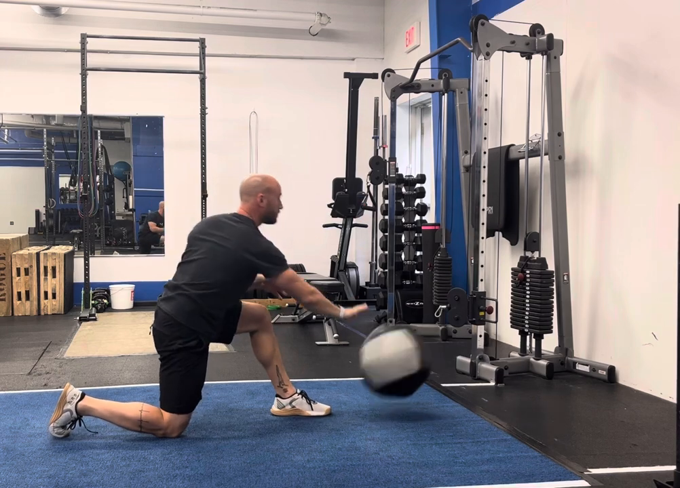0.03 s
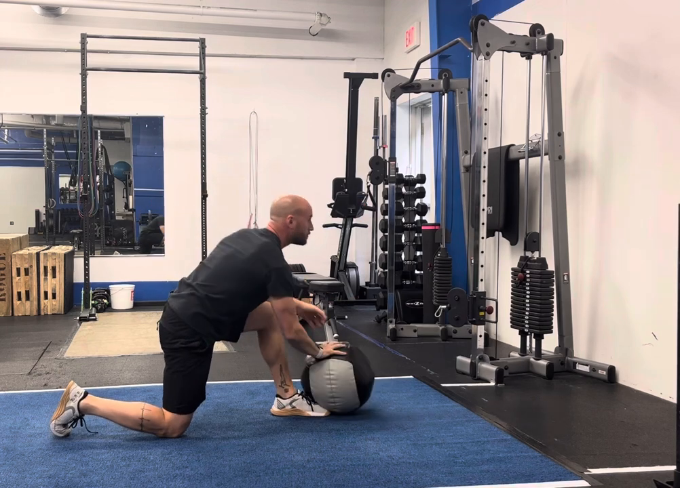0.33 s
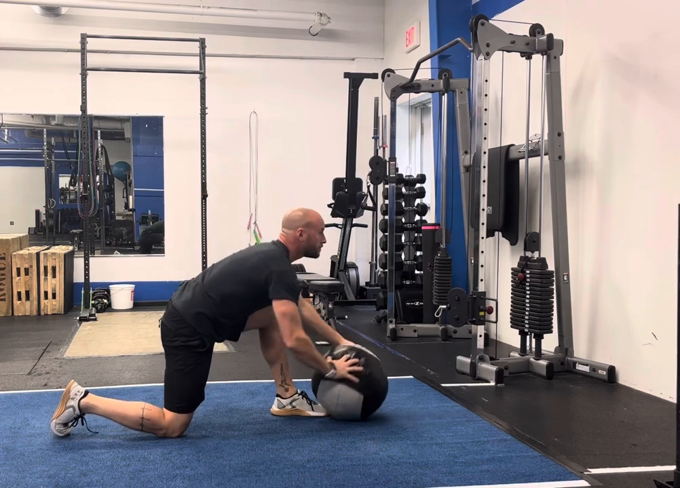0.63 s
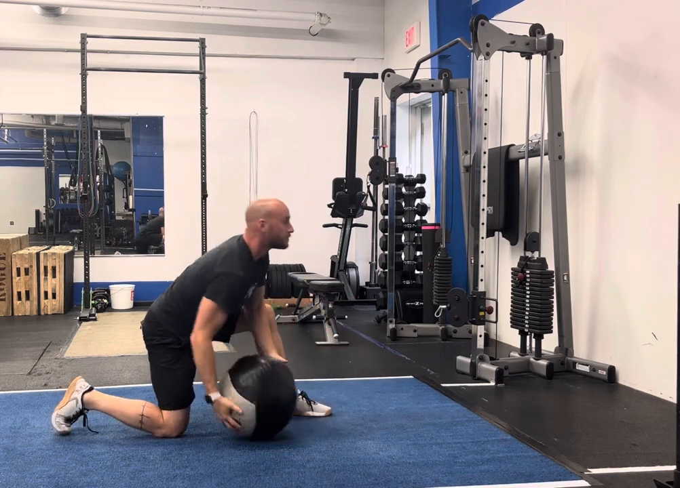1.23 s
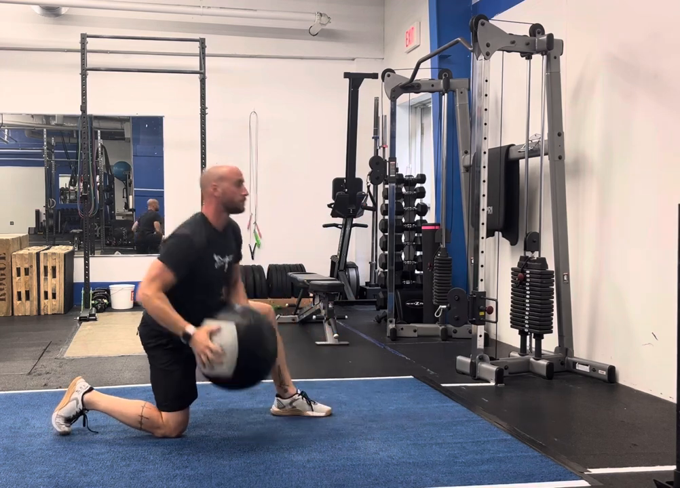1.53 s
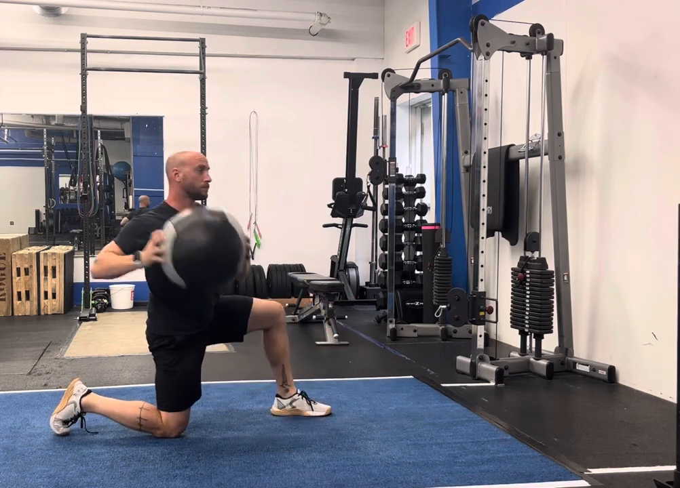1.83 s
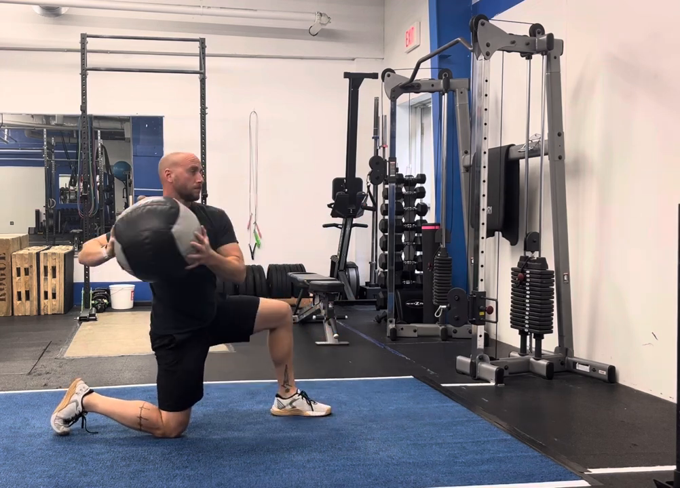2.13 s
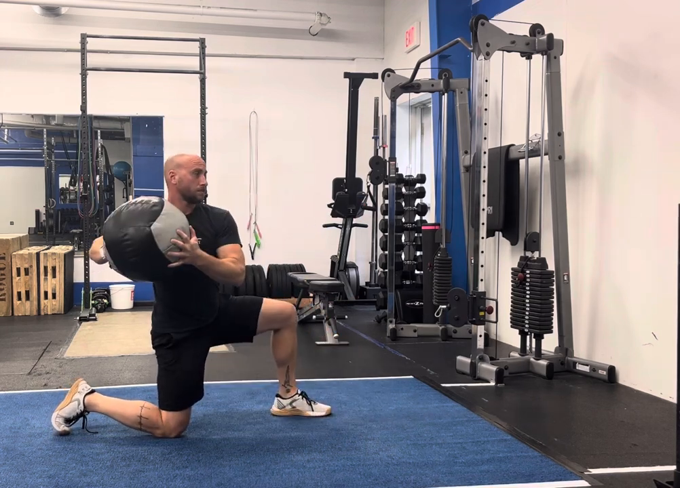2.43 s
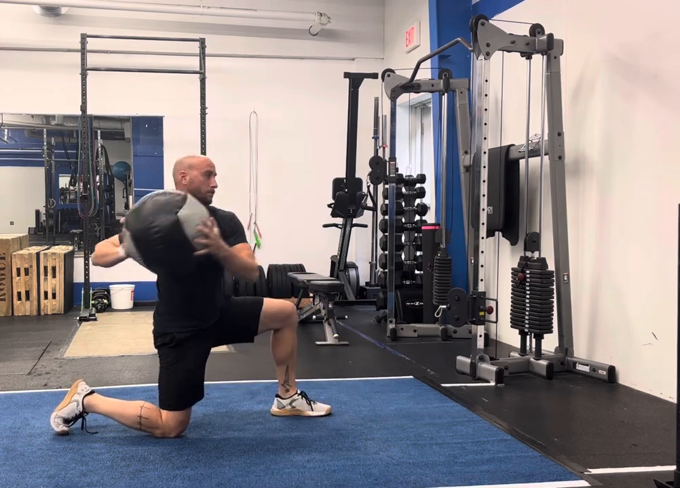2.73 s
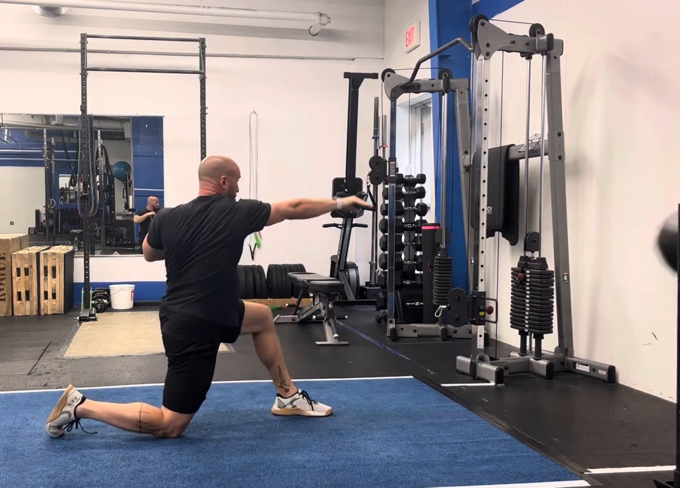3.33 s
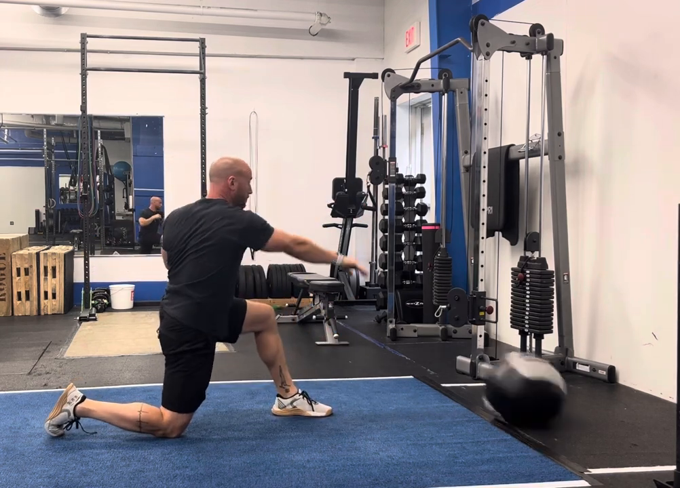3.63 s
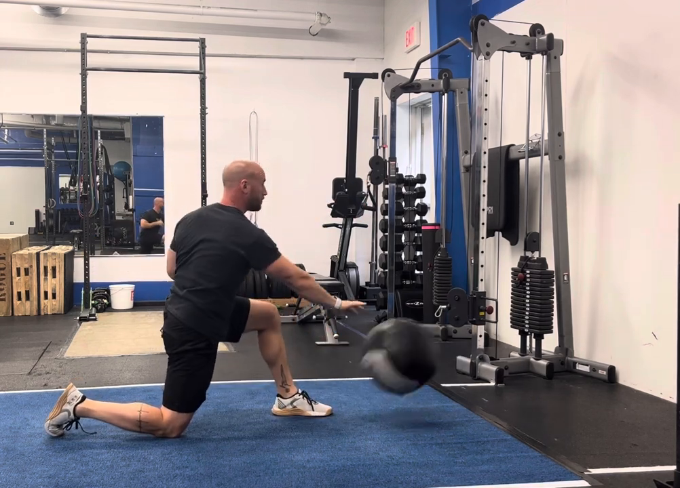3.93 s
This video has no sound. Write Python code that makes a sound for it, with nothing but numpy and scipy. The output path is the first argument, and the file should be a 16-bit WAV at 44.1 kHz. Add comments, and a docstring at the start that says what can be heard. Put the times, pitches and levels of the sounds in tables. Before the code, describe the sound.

Medicine ball booming against a hollow wall, then dropping to the floor in an echoing gym.

```python
"""In a gym, a padded medicine ball lands on a mat, is gathered up, then hurled at a hollow wall.
Hands pat, rub and roll it. At the wall its cover cracks, the panel booms and shudders on its frame,
and the fittings ring and buzz. The ball drops on the rubber floor: a smack of cover, a thud of filling.
The hard room rings after every blow, over the hum and air of the ventilation."""
import sys
import numpy as np
from scipy import signal
from scipy.fft import rfft, irfft
from scipy.io import wavfile
from scipy.ndimage import uniform_filter1d

SR = 44100
rng = np.random.default_rng(int(sys.argv[2]) if len(sys.argv) > 2 else 0)


def store_wav(level_fs):
    """Save 16-bit WAV to argv[1]."""
    pcm = np.round(np.clip(np.atleast_2d(level_fs), -1, 1) * 32767)
    wavfile.write(sys.argv[1], SR, pcm.T.astype(np.int16))


N = 176400
T, FREQS = np.arange(N) / SR, np.fft.rfftfreq(N, 1 / SR)
RING = 65536  # samples given to one blow and its tail
DIRECT_LIKENESS = 0.99  # left-right correlation of direct sound: almost mono

# modes of the padded ball: f/Hz, level/dB, t60/s
BALL_MODES = [(76.7, -3, 0.15), (144, -6, 0.11), (201, -7, .12), (253, -4, 0.075), (349.4, -5, 0.1)]


def wall_hit(at_s=3.323):
    """The throw lands: the cover cracks, the room answers, the panel booms and knocks on its frame."""
    slap_spectrum = [(120, -6), (220, -3), (330, -7), (460, -7.5), (650, -12.5), (850, -15.5),
                     (1050, -13.5), (1400, -15), (1850, -17), (2800, -20.5), (4800, -21), (7000, -27.5),
                     (10000, -27.5), (13300, -26), (15000, -43)]  # bright wash of the room: f/Hz, level/dB
    boom_spectrum = [(20, -10), (30, 2), (45, -7), (70, 9), (110, -10), (170, -3.5), (300, -18), (900, -65)]  # slower low bloom: f/Hz, level/dB
    panel_modes = [(62.8, -13, .45), (72, -2, 0.33), (92, 1.5, 0.21), (109.2, -12, 0.57),
                   (154.8, -8.5, 0.49), (169.9, -9, .35), (239, -7.5, 0.64)]  # hollow wall panel: f/Hz, level/dB, t60/s
    shudders = [(3.334, -9.5, 0.0064), (3.355, -16, 0.0054), (3.382, -13.5, 0.0032), (3.408, -7, .005),
                (3.515, -11, 0.0044), (3.579, -21, 0.0058)]  # knocks of the flexing panel: t/s, level/dB, push length/s
    out = np.zeros((2, N))
    add(out, at_s, cover_crack())
    add(out, at_s, undb(-13.5) * room(slap_spectrum, rise_s=0.0094))
    add(out, at_s, undb(-14) * room(boom_spectrum, rise_s=0.099))
    add(out, at_s, undb(-31.5) * fittings_ring())
    for start, db, push_s in shudders:
        add(out, start, undb(db) * thud(panel_modes, push_s))
    return out


def cover_crack(length_s=0.0048, level_db=-10, whip_lag_s=0.003):
    """The cover flattens against the wall and whips tight; nearby surfaces send the crack back."""
    spectrum = [(200, 10), (600, -3), (1100, 14), (2000, -4), (4500, -0.5), (7000, -7), (11000, 0),
                (15000, -4.5)]  # direct crack: f/Hz, level/dB
    echo_spectrum = [(300, -5), (650, -9), (1080, 7), (1450, -8), (1850, 1.5), (2500, -14.5), (5000, -8),
                     (9000, -17), (15000, -28)]  # duller reflected crack: f/Hz, level/dB
    echoes = [(.0085, -14), (.0145, -2.5), (.029, -8), (.037, -6)]  # early reflections: lag/s, level against the crack/dB
    out = np.zeros((2, N))
    flattening = np.sin(np.pi * np.minimum(T[:RING] / length_s, 1) ** 2)
    add(out, 0, undb(level_db) * flattening * noise(spectrum, 0, DIRECT_LIKENESS, size=RING))
    whip = fade(0.0037) * noise(spectrum, tilt=2, likeness=DIRECT_LIKENESS, size=RING)
    add(out, whip_lag_s, undb(-14) * whip)
    for lag, db in echoes:
        add(out, lag, undb(level_db + db) * flattening * noise(echo_spectrum, size=RING))
    return out


def fittings_ring(rise_s=0.023):
    """Shaken by the blow, frame and fittings swell into a cluster of dying tones."""
    modes = [(287, 0, .9), (351, 0, .8), (374, 0, .5), (460, 3, .7), (536, -1, .7), (656, -2, .5),
             (759, 0, .45), (1046, 2, .4), (1123, -2, .45), (1303, 0, .35), (1519, -4, .5), (1864, -2, .45),
             (1897, -3, .45)]  # frame and fittings: f/Hz, level/dB, t60/s
    t = T[:RING]
    phases = rng.random((len(modes), 2, 1))
    ring = sum(undb(db) * np.sin(2 * np.pi * (hz * t + phase)) * fade(t60)
               for (hz, db, t60), phase in zip(modes, phases))
    return ring * (1 - np.exp(-t / rise_s))


def fitting_buzz():
    """A loose metal fitting chatters briefly after the blow."""
    return undb(-32) * resonance(at_s=3.439, half_s=0.009, hz=2300, width_hz=170)


def mat_landing(thud_lag_s=0.002):
    """The ball lands on the mat: the cover smacks first and the filling thuds after it."""
    # impacts: t/s, smack/dB, smack t60/s, room/dB, thud/dB, push length/s
    landings = [(0.099, -35, .05, -45.5, -49, 0.0022), (0.1083, -24, .03, -35, -20, 0.0013),
                (0.171, -32, 0.095, -52, -24.5, .002)]
    spectrum = [(120, 3.5), (280, 2), (450, 2.5), (900, -5.5), (1500, -7), (3000, -16.5), (5000, -22),
                (11000, -33.5), (15000, -40)]  # cover on mat: f/Hz, level/dB
    out = np.zeros((2, N))
    for start, smack_db, t60, room_db, thud_db, push_s in landings:
        add(out, start, undb(smack_db) * smack(spectrum, t60, tilt=-2.2))
        add(out, start, undb(room_db) * room(spectrum, rise_s=0.0013))
        add(out, start + thud_lag_s, undb(thud_db) * thud(BALL_MODES, push_s))
    return out


def floor_drop(at_s=3.621, thud_lag_s=0.014):
    """Off the wall, the ball hits the rubber floor with a smack and a heavy thud."""
    spectrum = [(80, 7), (150, 3), (320, 2), (550, 2.5), (800, -6.5), (1200, -6.5), (2000, -13),
                (4500, -18), (7000, -25.5), (11000, -27), (13500, -28), (15000, -44)]  # cover on rubber: f/Hz, level/dB
    out = np.zeros((2, N))
    add(out, at_s, undb(-17) * smack(spectrum, t60=0.19))
    add(out, at_s, undb(-25) * room(spectrum, rise_s=0.0013))
    add(out, at_s + thud_lag_s, undb(-10) * thud(BALL_MODES, push_s=0.0025))
    return out


def rolling(waver_db=1.5):
    """The ball rolls over the mat with an uneven murmur."""
    levels = [(.15, -58), (.3, -54), (.65, -47.5), (.85, -61.5), (1.15, -54.5), (1.4, -61), (1.7, -73)]  # course of the roll: t/s, level/dB
    spectrum = [(100, -12), (250, -5.5), (335, 3), (390, -8.5), (470, 4.5), (560, -1), (750, -3),
                (1300, -5.5), (3000, -45)]  # cover rolling on mat: f/Hz, level/dB
    level_db = np.interp(T, *np.array(levels).T, left=-90, right=-90)
    return noise(spectrum) * undb(level_db + waver_db * wander(17.86))


def hand_pats(room_db=-9.5):
    """Hands pat the cover, each touch with a little room behind it."""
    pats = [(.165, -38, 3), (0.532, -44, -3), (.675, -53, 2), (1.625, -60, 1.5), (1.964, -43, 2.5),
            (2.61, -57, -2), (2.885, -46, -.5), (3.105, -41.5, -5)]  # touches: t/s, level/dB, tilt/(dB per octave)
    spectrum = [(100, 10), (300, -2), (700, 7.5), (1500, -5), (3000, -11.5), (6000, -23.5), (11000, -22),
                (15000, -26)]  # palm on cover: f/Hz, level/dB
    out = np.zeros((2, N))
    for start, db, tilt in pats:
        direct = smack(spectrum, t60=0.13, tilt=tilt)
        tail = undb(room_db) * room(spectrum, rise_s=0.002, tilt=tilt)
        add(out, start, undb(db) * (direct + tail))
    return out


def cover_rubs(grain_db=1.75):
    """The cover slides over mat, palms and shirt in grainy swishes."""
    rubs = [(-0.007, 0.071, -51.5, -0.5), (0.578, 0.072, -48, -5.5), (0.709, 0.046, -54.5, 0),
            (.9, 0.32, -62.5, 2), (1.115, 0.1, -60, 5.5), (1.72, 0.1, -57, -2), (2.69, 0.082, -57.5, -3),
            (2.919, .04, -55, -1), (3.077, 0.082, -61.5, 2)]  # strokes: centre t/s, half length/s, level/dB, tilt/(dB per octave)
    spectrum = [(200, -5), (600, 2), (1500, 4), (3000, -2), (6000, -10), (11000, -14.5), (15000, -22)]  # sliding friction: f/Hz, level/dB
    return sum(noise(spectrum, tilt) * swell(at_s, half_s) * undb(db + grain_db * wander(150))
               for at_s, half_s, db, tilt in rubs)


def ball_groans():
    """Friction on the cover stirs the hollow resonances of the ball as it is rolled and lifted."""
    groans = [(.93, .022, 634, -55), (1.12, 0.028, 475, -49.5), (1.267, .022, 475, -49),
              (1.43, .022, 444, -50), (1.556, .025, 337, -53.5), (1.778, 0.041, 432, -54)]  # brief hums of the body: centre t/s, half length/s, f/Hz, level/dB
    return sum(undb(db) * resonance(at_s, half_s, hz, width_hz=31) for at_s, half_s, hz, db in groans)


def smack(spectrum, t60, tilt=0):
    """The direct contact of the cover: a snap and a short flutter."""
    snap = undb(4.5) * fade(0.012)
    return noise(spectrum, tilt, DIRECT_LIKENESS, size=RING) * (snap + fade(t60)) / 2


def thud(modes, push_s):
    """Modes rung by a soft half-sine push: the longer the push, the duller the thud."""
    ring = sum(undb(db) * np.sin(2 * np.pi * hz * T[:RING]) * fade(t60) for hz, db, t60 in modes)
    push = np.sin(np.pi * np.linspace(0, 1, int(push_s * SR)))
    return -signal.fftconvolve(ring, push / push.sum())[:RING]


def resonance(at_s, half_s, hz, width_hz):
    """A short rough swell of one resonance, rms 1 at its height."""
    passband = np.exp(-((FREQS - hz) / width_hz) ** 2)
    band = irfft(rfft(rng.standard_normal((2, N))) * passband, N)
    return band / band.std() * swell(at_s, half_s)


def room(spectrum, rise_s, tilt=0):
    """Dense reflections of a blow: they build up, then each band dies at its own rate."""
    decay_times = [(60, 1.26), (250, 0.93), (600, 0.64), (1500, 0.71), (4000, 0.83), (8000, 0.76165),
                   (13000, 0.41)]  # reverberation of the gym: f/Hz, t60/s
    hz, t60s = np.array(decay_times).T
    wash = rfft(noise(spectrum, tilt, size=RING))
    octaves = np.log2(np.fft.rfftfreq(RING, 1 / SR) + 1)
    bands = (np.interp(octaves, np.log2(hz), peak) for peak in np.eye(len(hz)))  # overlapping triangles
    tail = sum(irfft(wash * band) * fade(t60) for band, t60 in zip(bands, t60s))
    return tail * (1 - np.exp(-T[:RING] / rise_s))


def ventilation(waver_db=2.26, drift_rad=0.13):
    """A wavering motor hum, duct rumble and steady air."""
    motor_tones = [(59.2, -38), (118.4, -43.5), (177.6, -55), (441, -69), (657, -72), (780, -72),
                   (1077, -74), (4850, -84)]  # lines of the hum: f/Hz, rms level/dB
    rumble_spectrum = [(20, -16), (35, -16), (50, 0.5), (62, 5), (85, 0), (140, -8), (200, -20), (300, -34),
                       (600, -57)]  # ducts: f/Hz, level/dB
    air_spectrum = [(200, -3), (320, -11.5), (470, -13), (600, -17.5), (1400, -19), (2500, -26),
                    (4200, -36.5), (5100, -33.5), (7000, -42.5), (13000, -48.5), (15000, -66)]  # moving air: f/Hz, level/dB
    hum = np.zeros(N)
    for hz, db in motor_tones:
        amplitude = np.sqrt(2) * undb(db + waver_db * wander(9))
        hum += amplitude * np.sin(2 * np.pi * hz * T + drift_rad * wander(4.6))
    return hum + undb(-41) * noise(rumble_spectrum) + undb(-52) * noise(air_spectrum)


def noise(spectrum, tilt=0, likeness=None, size=N):
    """Stereo noise of rms 1, tilted in dB per octave, falling away below the spectrum's lowest point."""
    room_likeness = [(60, 0.88), (125, 0.85), (250, 0.83), (500, 0.12), (1000, 0.067), (2500, 0.48),
                     (7000, .05), (12000, 0.37)]  # stereo image of the room: f/Hz, left-right correlation
    if likeness is None:
        likeness = along(room_likeness, size)
    hz = np.fft.rfftfreq(size, 1 / SR) + 1
    low_rolloff = np.minimum(hz / spectrum[0][0], 1) ** 2
    gain = undb(along(spectrum, size) + tilt * np.log2(hz)) * low_rolloff
    mid, side = np.exp(2j * np.pi * rng.random((2, len(hz))))
    stereo = mid * np.sqrt(1 + likeness) + side * np.sqrt(1 - likeness) * np.array([[1], [-1]])
    x = irfft(gain * stereo, size)
    return x / x.std()


def along(points, size=N):
    """A table of f/Hz, value read at every frequency of a spectrum."""
    hz, value = np.array(points, float).T
    return np.interp(np.log(np.fft.rfftfreq(size, 1 / SR) + 1), np.log(hz), value)


def undb(db):
    """Decibels to gain."""
    return 10 ** (np.asarray(db) / 20)


def fade(t60):
    """Exponential decay, 60 dB down after t60 seconds."""
    return np.exp(-np.log(1000) * T[:RING] / t60)


def swell(at_s, half_s):
    """A bell-shaped envelope peaking at at_s."""
    return np.exp(-((T - at_s) / half_s) ** 2 / 2)


def wander(rate_hz):
    """Glides between random values, with a spread of 1."""
    step = int(SR / rate_hz)
    held = np.repeat(rng.standard_normal(N // step + 1), step)
    glide = uniform_filter1d(held, step)[:N]
    return glide / glide.std()


def add(out, at_s, sound):
    """Mix a sound in at a time."""
    i = int(at_s * SR)
    out[:, i:i + sound.shape[-1]] += sound[..., :N - i]


def scene():
    """Over the ventilation: quiet handling and the ball's blows on mat, floor and wall."""
    bed = ventilation()
    handling = rolling() + hand_pats() + cover_rubs() + ball_groans()
    return bed + handling + mat_landing() + floor_drop() + wall_hit() + fitting_buzz()


def record(dry):
    """Slightly unlike left and right, with thin deep bass, a narrow notch near 8 kHz and a steep top cut."""
    balance = [(60, -1.5), (250, -2.0917), (500, -0.5), (1000, -3.5), (2000, 1.5), (4000, 4), (8000, 1),
               (12000, -0.5)]  # channel balance: f/Hz, left minus right/dB
    notch_hz, notch_width_hz, notch_db = 8354, 660, -25
    low_cut_hz, top_cut_hz = 32, 14400
    notch = notch_db * np.exp(-((FREQS - notch_hz) / notch_width_hz) ** 2)
    gain = undb(notch + along(balance) * np.array([[1], [-1]]) / 2)
    coloured = irfft(rfft(dry) * gain, N)
    thinned = signal.sosfilt(signal.butter(2, low_cut_hz, "high", fs=SR, output="sos"), coloured)
    return signal.sosfilt(signal.ellip(8, .2, 70, top_cut_hz, fs=SR, output="sos"), thinned)


dry = scene()
out = record(dry)
store_wav(out)
```